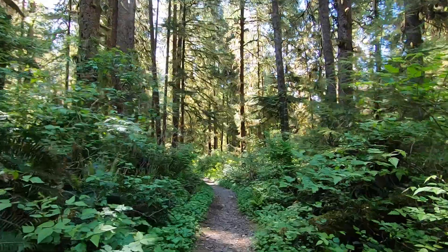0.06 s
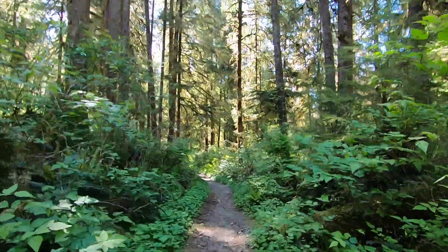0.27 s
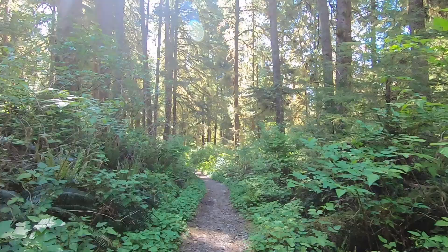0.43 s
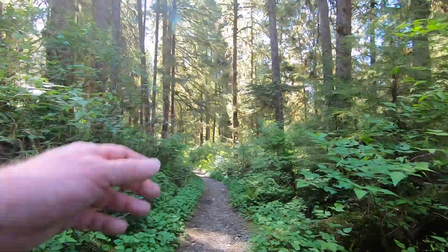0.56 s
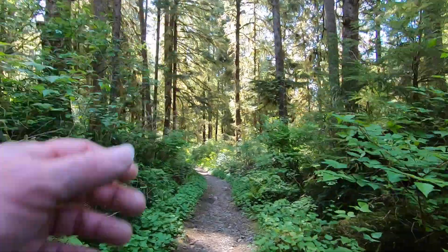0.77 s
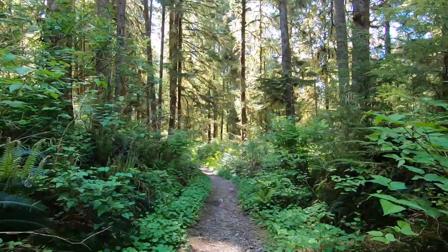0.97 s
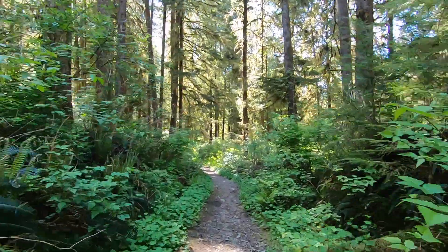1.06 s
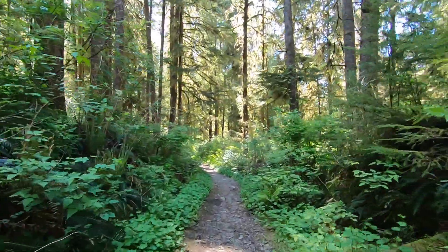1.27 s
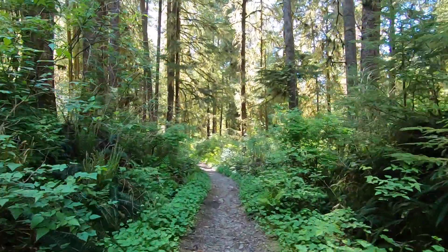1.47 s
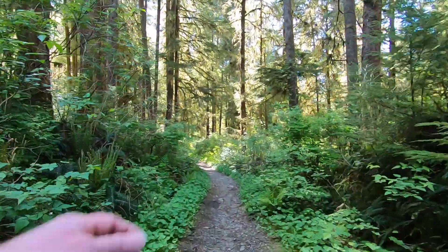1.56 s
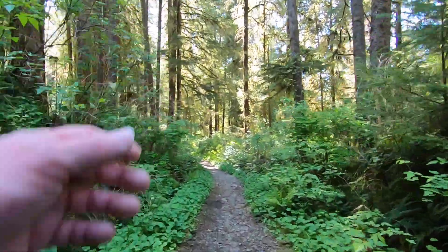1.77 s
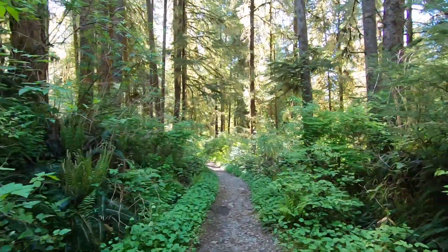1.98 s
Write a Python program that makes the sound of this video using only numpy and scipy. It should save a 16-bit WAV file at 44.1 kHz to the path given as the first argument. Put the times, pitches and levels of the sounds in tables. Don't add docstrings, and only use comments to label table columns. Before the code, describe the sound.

Footsteps walking on a dirt path, thumping and crunching close to a chest-worn microphone

```python
import sys
import numpy as np
from scipy import signal
from scipy.fft import rfft, irfft
from scipy.io import wavfile
from scipy.ndimage import uniform_filter1d

SR = 44100
rng = np.random.default_rng(int(sys.argv[2]) if len(sys.argv) > 2 else 0)


def transcribe(signal):
    frames = np.atleast_2d(signal).T
    limited = np.clip(frames, -1, 1)
    pcm = np.round(limited * 32767).astype(np.int16)
    wavfile.write(sys.argv[1], SR, pcm)


def volts_from_db(level):
    exponent = np.asarray(level, float) / 20
    return 10 ** exponent


N = 88729
T = np.arange(N) / SR

# time in seconds, level in dB.
CLOTH_SWING = [(0, -57), (.1, -54.5), (.195, -50), (.225, -60.5), (.3, -46), (.42, -50), (.54, -56),
               (.7, -54), (.8, -48.5), (1., -56.5), (1.08, -56), (1.2, -47.5), (1.36, -50), (1.42, -58),
               (1.62, -55.5), (1.72, -56), (1.85, -56.5), (2.02, -55)]
# time in seconds, level of the side in dB.
STEREO_WIDTH = [(0, 1), (.25, -7), (.33, -9), (.55, -24.5), (.7, -31), (1.2, -52), (1.62, -41), (1.8, -13),
                (2.02, -7.5)]


def curve(points):
    s, db = np.transpose(points)
    return volts_from_db(np.interp(T, s, db, -120, -120))


def evened(x):
    return x / np.sqrt(np.mean(x ** 2) + 1e-20)


def butter(x, order, hz, kind="low"):
    return signal.sosfilt(signal.butter(order, hz, kind, fs=SR, output="sos"), x)


def colour(x, points):
    hz = np.fft.rfftfreq(N, 1 / SR)
    f, db = np.transpose(points)
    gain_db = np.interp(np.log(hz + 1), np.log(f + 1), db, right=-90)
    return irfft(rfft(x) * volts_from_db(gain_db), N)


def patchy(x, patchy_db):
    z = signal.stft(x, nperseg=512)[2]
    patch = uniform_filter1d(rng.standard_normal(z.shape), size=6, axis=0)
    patch = evened(uniform_filter1d(patch, size=5, axis=1))
    return evened(signal.istft(z * volts_from_db(patchy_db * patch), nperseg=512)[1][:N])


def ring(x, hz, width):
    r = np.exp(-np.pi * width * hz / SR)
    turn = 2 * np.pi * min(hz, SR / 3) / SR
    return evened(signal.lfilter([1, 0, -1], [1, -2 * r * np.cos(turn), r * r], x))


def bursts(rows, wander, fizz):
    out, t = np.zeros(N), np.arange(2600) / SR
    for s, db, hz, ring_s in rows:
        shape = (1 - np.exp(-t * hz / 0.22)) ** 2 * volts_from_db(-20 * t / max(ring_s, .002))
        drift = evened(uniform_filter1d(rng.standard_normal(len(t)), size=int(SR / hz) + 1))
        phase = 2 * np.pi * np.cumsum(hz * (1 + wander * drift)) / SR
        tone = evened(shape * np.sin(phase))
        crackle = ring(shape * rng.standard_normal(len(t)), hz, .8)
        crackle = ring(ring(crackle, hz, 1.1), hz, 2.2)
        sound = ring(tone, hz, .9) + fizz * crackle
        part = out[round(s * SR):][:len(t)]
        part += volts_from_db(db) * (sound / abs(sound).max())[:len(part)]
    return out


def heel_thumps():
    # time of the crest in seconds, peak in dB, pitch in Hz with the sign of the push,
    # rebound length in cycles.
    swings = [(0.2813, -7.5, 212, 0.64), (0.287, -19.5, 152, 0.42), (0.326, -26.5, 198, 1),
              (0.363, -33, 73, .5), (.386, -34, 45, 0.63), (.411, -33, -68, 0.54), (.455, -38, 53, .6),
              (0.7584, -19.5, 182, 0.68), (0.771, -25, 120, 0.48), (0.793, -31, 118, 0.73),
              (0.809, -28, -100, 0.7), (0.822, -23.5, -150, 0.65), (.845, -32, -51, 0.37),
              (0.868, -28.5, 118, 0.29), (0.925, -29.5, -24, 0.63), (1.249, -23, 295, .5),
              (1.2956, -9, 182, 0.6), (1.301, -24, -48, 0.3), (1.311, -22.5, 69, 0.21),
              (1.337, -25, -161, 0.26), (1.7545, -25, 236, 0.93), (1.765, -29.5, -78, 0.42),
              (1.782, -20, -120, 0.76), (1.7918, -26, -150, 0.25), (1.809, -22, -73, 0.72),
              (1.832, -15.5, -130, .4), (1.8347, -17, 82, 0.19), (1.851, -28.5, -100, 0.69)]
    dip_cycles, lean_rad = 0.38, 0.081
    out = np.zeros(N)
    for s, db, hz, rebound_cycles in swings:
        cycles = (T - s) * abs(hz)
        fade = np.exp(-(cycles / np.where(cycles < 0, dip_cycles, rebound_cycles)) ** 2)
        out += volts_from_db(db) * np.sign(hz) * np.cos(2 * np.pi * cycles + lean_rad) * fade
    return out


def knocks():
    # time in seconds, peak in dB, pitch in
    # Hz, ring in seconds.
    knock_events = [(.246, -34, 595, 0.0057), (.264, -23, 667, 0.0034), (.270, -19.5, 944, 0.0083),
                    (.276, -21.5, 1120, 0.005), (.292, -26, 1180, 0.0049), (.320, -20, 1437, 0.011),
                    (.362, -36, 1990, 0.024), (.7483, -23.5, 1220, 0.0036), (.7635, -19.5, 675, 0.0038),
                    (.7743, -17.5, 1070, 0.0019), (.7778, -19, 1135, 0.0048), (.776, -21.5, 474, 0.0056),
                    (.788, -23.5, 580, 0.006), (.986, -40, 1584, 0.053), (1.181, -31.5, 1630, 0.0032),
                    (1.241, -17.5, 870, 0.0044), (1.248, -14.5, 530, 0.0035), (1.269, -25, 646, 0.01),
                    (1.289, -11, 1120, 0.0068), (1.290, -13, 390, 0.0023), (1.315, -26.5, 1240, 0.0023),
                    (1.340, -32, 392, 0.0059), (1.366, -25, 1500, 0.0036),
                    (1.71, -31.5, 1316, 0.0066), (1.725, -36, 1420, 0.0055), (1.753, -25, 646, 0.0037),
            (1.767, -27, 920, 0.014), (1.777, -15.5, 1030, 0.0013), (1.7812, -12, 1240, 0.0055),
            (1.7796, -15.5, 423, 0.012), (1.787, -22, 1040, 0.012), (1.799, -26, 1420, 0.005),
            (1.8234, -20, 1100, 0.0026), (1.838, -23.5, 1510, 0.013), (1.877, -31, 1490, 0.01),
                    (.259, -20.5, 560, 0.0023), (.2765, -16.5, 720, 0.0016), (0.304, -38, 1920, .012),
              (0.333, -47, 1910, 0.0044), (.367, -40.5, 460, 0.024), (0.798, -30, 1200, 0.0039),
              (.815, -34.5, 1860, .006), (.821, -33, 1300, .005), (.853, -34, 980, 0.006),
              (0.869, -32, 1510, 0.01), (.883, -34.5, 1350, .005), (1.237, -27.5, 514, 0.0048),
              (1.259, -34, 690, .005), (1.260, -49, 2090, 0.0036), (1.274, -28, 810, .006),
              (1.281, -31, 514, 0.0029), (1.308, -35, 1270, 0.0038), (1.341, -27.5, 1320, 0.0034),
              (1.753, -39, 1500, 0.0025), (1.771, -22, 580, 0.0071), (1.794, -26, 700, 0.0075),
              (1.805, -27, 1240, 0.0046), (1.827, -23, 1700, .004), (1.85, -41, 1940, 0.0037)]
    return bursts(knock_events, wander=.18, fizz=.45)


def grit_snaps():
    # time in seconds, peak in dB, pitch in Hz, ring in seconds.
    snaps = [(.277, -32.5, 3165, 0.014), (.294, -54, 3600, 0.0093), (.305, -36, 3930, 0.035),
             (.319, -32.5, 3390, 0.0095), (.395, -39, 6410, 0.03), (.709, -38.5, 2910, 0.012),
             (.753, -37, 3980, 0.0084), (.787, -33.5, 3920, 0.0099), (.788, -37.5, 11000, 0.0045),
             (1.2405, -27, 2990, 0.0097), (1.249, -40.5, 11420, 0.017), (1.270, -34.5, 3030, 0.006),
             (1.715, -43, 3300, 0.0089), (1.766, -29.5, 4150, 0.005), (1.778, -33.5, 2870, 0.01),
             (.765, -32.5, 2940, 0.0058), (1.826, -51, 11100, 0.049), (1.837, -32, 3040, 0.013),
             (.195, -54, 9200, .004), (.247, -58, 9400, 0.0053), (.277, -49, 9600, 0.0051),
             (0.293, -44, 9000, 0.0048), (0.321, -42, 11160, 0.0054), (0.401, -49, 11300, .02),
             (.611, -52, 7500, 0.0057), (.640, -50, 6900, .004), (.754, -52, 5930, .01),
             (.920, -63, 7700, .004), (1.187, -49, 6800, 0.009), (1.249, -38, 3350, .005),
             (1.539, -65, 7750, .004), (1.624, -66, 9600, 0.0037), (1.772, -33, 3510, 0.015),
             (1.778, -57, 12900, .012), (1.814, -36.5, 3800, 0.037), (1.839, -47, 12500, .01),
             (1.877, -55, 4600, 0.0036), (1.969, -72, 8650, .004)]
    return bursts(snaps, wander=.25, fizz=.55)


def grit_crunch():
    # time in seconds, level in dB.
    presses = [
        [(.236, -50), (.25, -43.5), (.27, -31.5), (.3, -35.5), (.34, -43.5), (.37, -38), (.41, -51.5),
         (.46, -41.5), (.52, -56.5)],
        [(.746, -48), (.751, -30.5), (.79, -32.5), (.83, -39.5), (.872, -38), (.92, -44.5), (1., -46.5),
         (1.07, -55.5)],
        [(1.232, -70), (1.243, -29.5), (1.285, -26), (1.32, -42.5), (1.36, -33), (1.39, -42), (1.5, -47),
         (1.6, -64)],
        [(1.68, -47), (1.745, -52), (1.78, -27), (1.815, -36.5), (1.842, -26), (1.86, -40), (1.89, -40.5),
         (2.02, -52.5)],
    ]
    # frequency in Hz, level in dB per Hz.
    grit_tone = [(60, -12), (190, -3), (400, -6.5), (1000, -12), (2100, -20.5), (4500, -33.5),
                 (10500, -52.5), (15500, -42)]
    grains_per_s, spread_db, grain_octaves = 480, 3.5, 0.4
    hz = np.fft.rfftfreq(N, 1 / SR) + 1
    spectrum = 0
    for centre_hz in np.geomspace(120, 13000, num=12):
        per_s = grains_per_s * (.5 + centre_hz / 1500) ** .8
        cracks = rng.random(N) < per_s / SR
        size = volts_from_db(spread_db * np.minimum(rng.exponential(1, N), 4)) * cracks
        clicks = evened(size * rng.choice([-1., 1.], N))
        band = np.exp(-(np.log2(hz / centre_hz) / grain_octaves) ** 2 / 2)
        spectrum = spectrum + rfft(clicks) * band
    crunch = patchy(colour(irfft(spectrum, N), grit_tone), patchy_db=3.0)
    return crunch * sum(curve(step) for step in presses)


def strap_rumble():
    # time in seconds, level in dB.
    sway = [(0, -46), (.05, -68), (.2, -72), (.27, -41), (.4, -39), (.47, -48), (.53, -88), (.71, -81),
            (.78, -40.5), (.95, -48), (1.05, -94), (1.22, -59), (1.33, -37), (1.44, -62), (1.49, -50),
            (1.65, -92), (1.82, -37), (2.01, -64)]
    low = butter(rng.standard_normal(N), 4, [18, 62], "band")
    low = low / uniform_filter1d(abs(signal.hilbert(low)), size=1500)
    return curve(sway) * evened(low)


def cloth_swish():
    # frequency in Hz, level in dB per Hz.
    cloth_tone = [(300, -9), (530, -7), (880, -9), (1410, -5), (4000, -13), (9540, -25.5), (15500, -33)]
    return curve(CLOTH_SWING) * patchy(colour(rng.standard_normal(N), cloth_tone), patchy_db=2.5)


def forest_hush():
    # frequency in Hz, level in dB per Hz.
    hush_tone = [(18, -57), (30, -13), (95, -106), (127, -0.5), (191, 5.5), (1560, -19.5), (3000, -21),
                 (3900, -76), (6600, -120)]
    level_db, wide_db = -49.5, -6.5
    hush = patchy(colour(rng.standard_normal(N), hush_tone), patchy_db=0.94)
    return volts_from_db(level_db + wide_db * curve(STEREO_WIDTH)) * hush


def stereo_side(mid):
    # frequency in Hz, level in dB.
    side_tone = [(500, -17.5), (1300, 4), (3000, -5), (15000, 10.5)]
    smear_s, bass_lag_s, bass_db, top_db = 0.0048, .045, -11.5, -21
    lean = 0.17
    smear = rng.standard_normal(4000) * volts_from_db(-20 * np.arange(4000) / SR / smear_s)
    blur = signal.oaconvolve(mid, smear / np.linalg.norm(smear))[:N]
    late_bass = np.roll(butter(mid, 2, 300), round(bass_lag_s * SR))
    tilted = colour((1 - lean) * blur - lean * mid, side_tone)
    side = curve(STEREO_WIDTH) * (tilted + volts_from_db(bass_db) * late_bass)
    return side + volts_from_db(top_db) * butter(blur, 4, 4500, "high")


def scene():
    mid = heel_thumps() + knocks() + grit_snaps() + grit_crunch()
    mid = mid + strap_rumble() + cloth_swish() + forest_hush()
    side = stereo_side(mid)
    return np.array([mid + side, mid - side])


def low_pass(x):
    return signal.sosfilt(signal.butter(12, 15610, fs=SR, output="sos"), x)


def record(dry):
    # frequency in Hz, width in Hz, level in dB.
    housing = [(1460, 44, 5), (5920, 1800, -7), (6700, 560, 3.5), (8000, 1600, -3), (9330, 330, 6),
               (9170, 690, -4)]
    # frequency in Hz, level in dB.
    roll_off = [(20, -1), (10300, -0.5), (11500, -15), (14500, -21), (15600, -37)]
    hiss_db = -28
    hz = np.fft.rfftfreq(N, 1 / SR)
    tone = volts_from_db(sum(db / (1 + (2 * (hz - f) / w) ** 2) for f, w, db in housing))
    heard = np.array([colour(x, roll_off) for x in irfft(rfft(dry) * tone, N)])
    hiss = butter(rng.standard_normal(dry.shape), 3, [10000, 14000], "band")
    return low_pass(heard + volts_from_db(hiss_db) * curve(CLOTH_SWING) * hiss)


dry = scene()
out = record(dry)
transcribe(out)
```